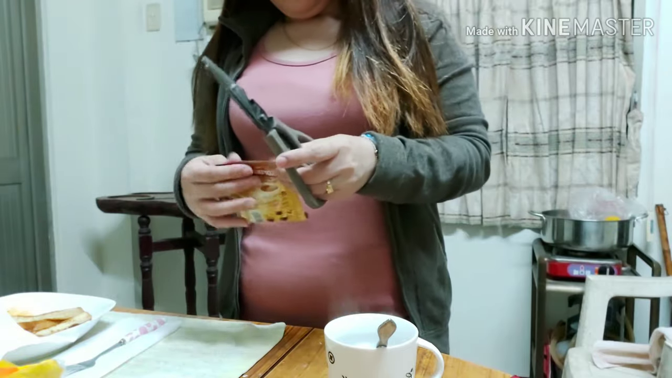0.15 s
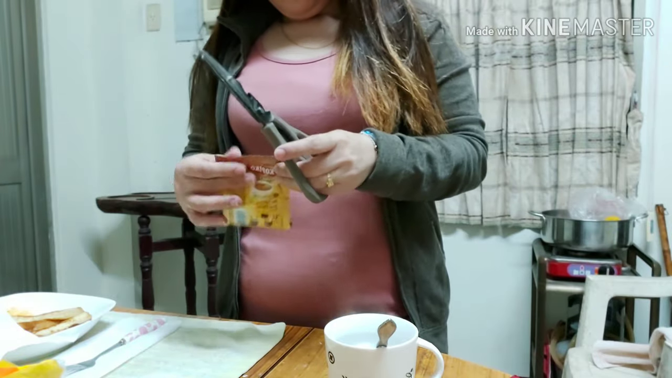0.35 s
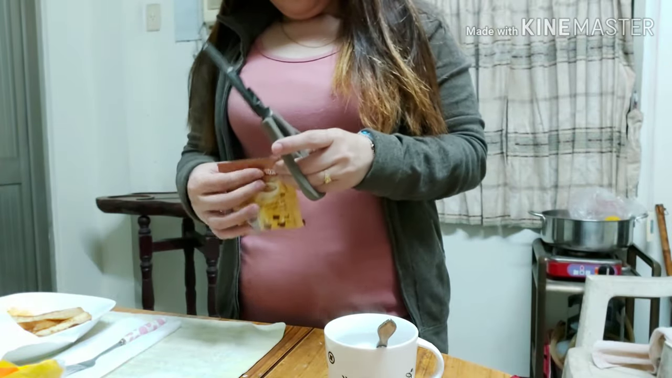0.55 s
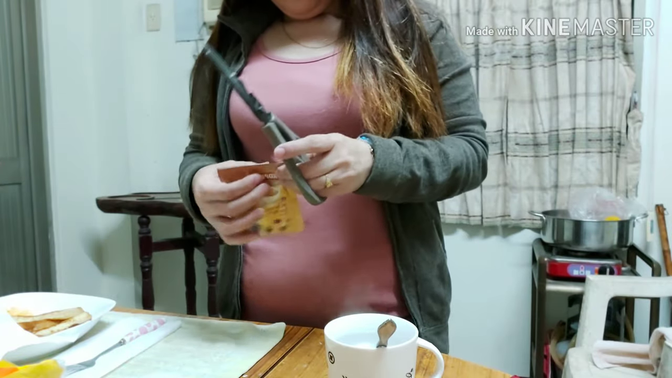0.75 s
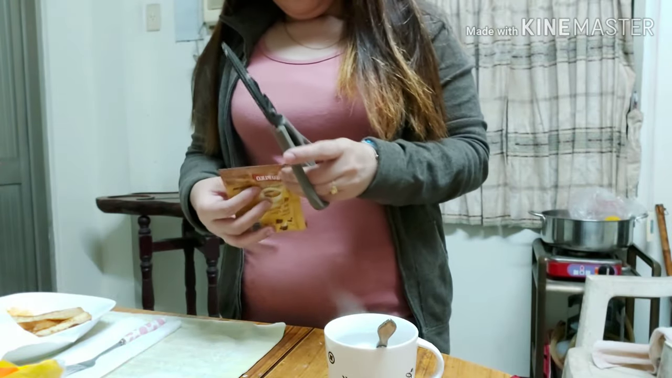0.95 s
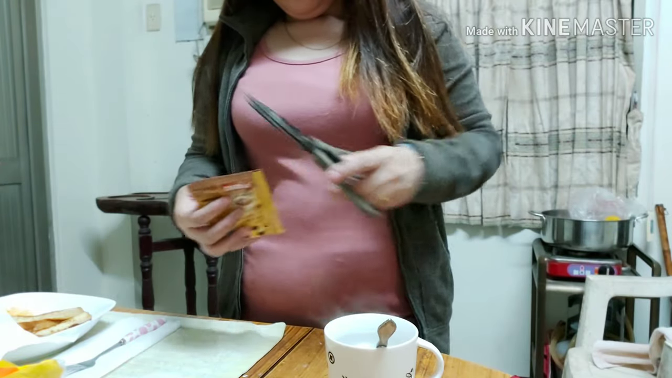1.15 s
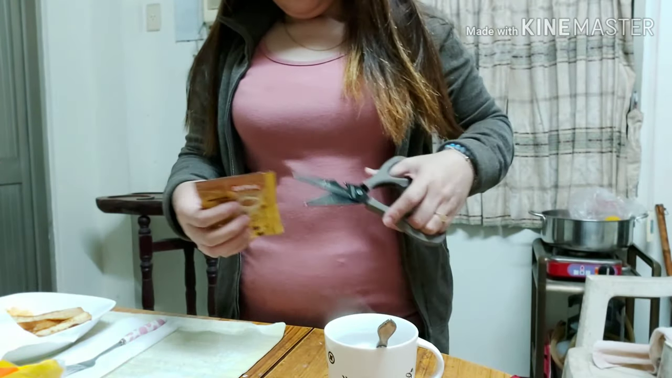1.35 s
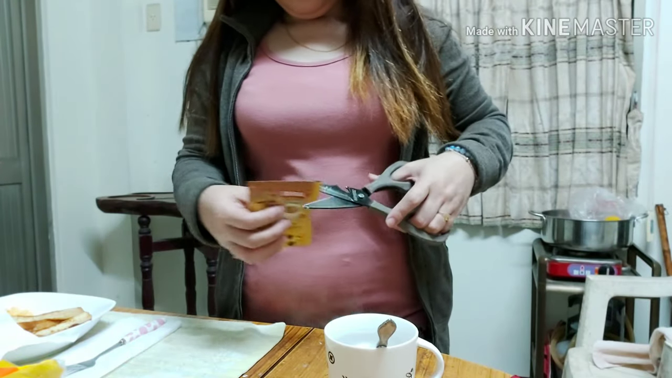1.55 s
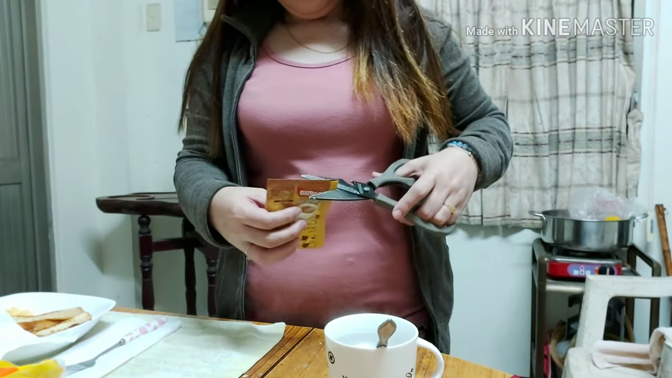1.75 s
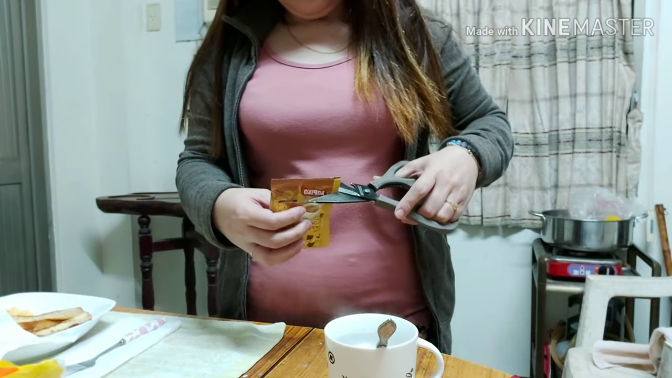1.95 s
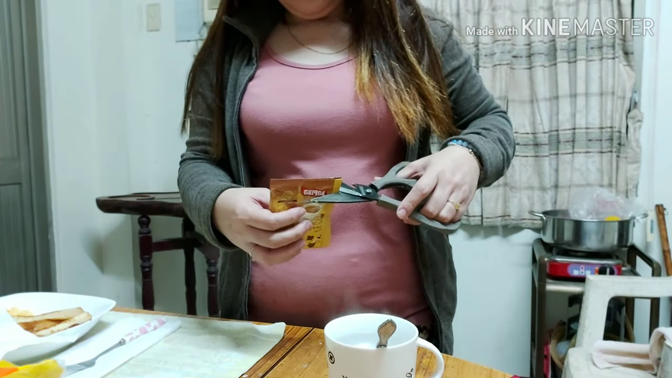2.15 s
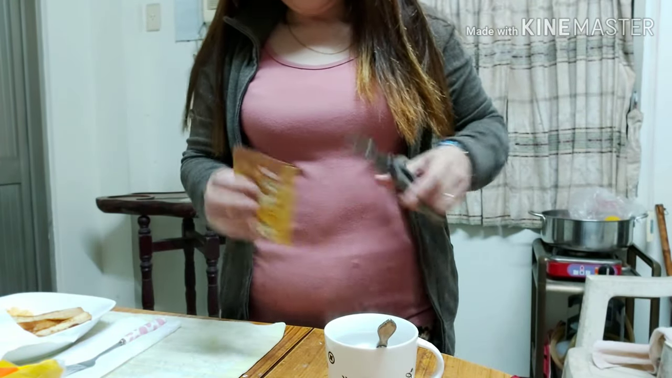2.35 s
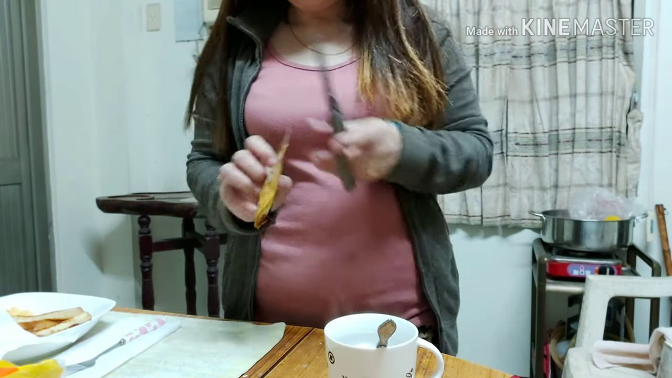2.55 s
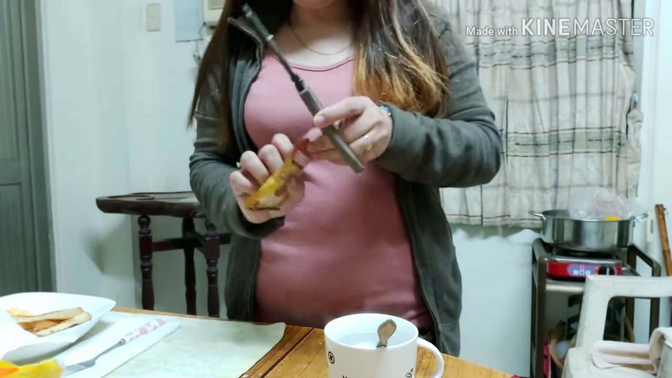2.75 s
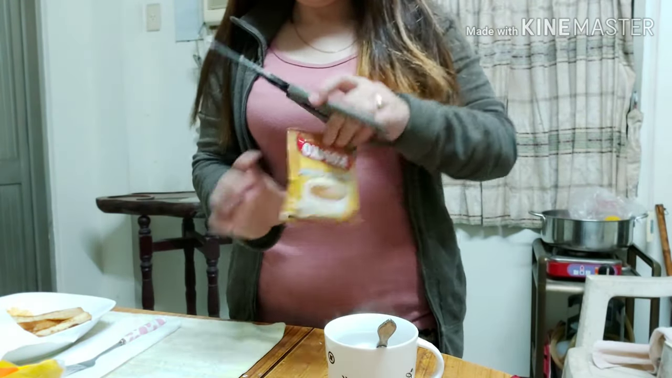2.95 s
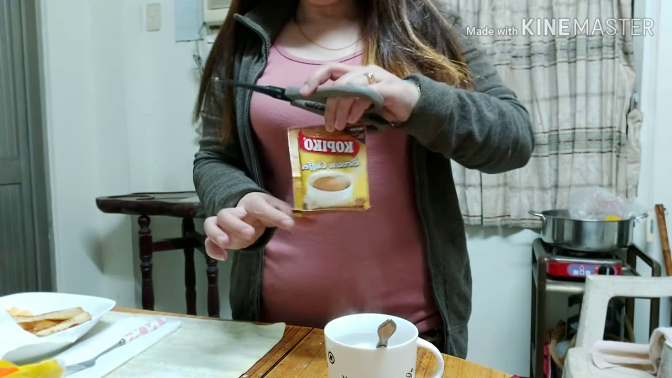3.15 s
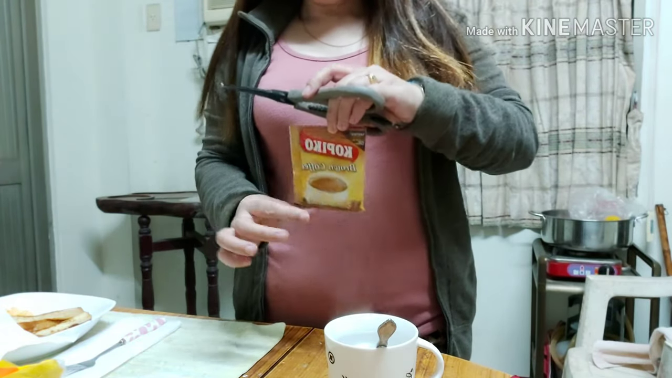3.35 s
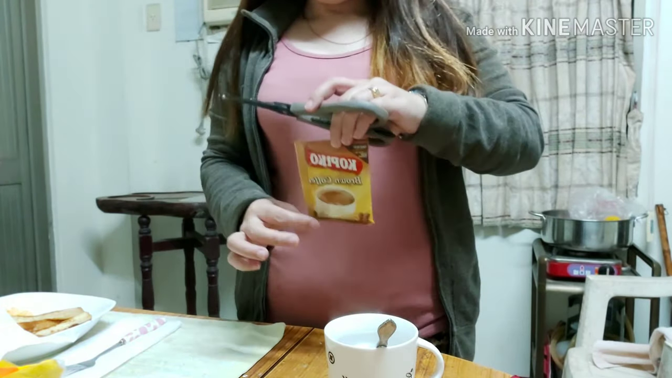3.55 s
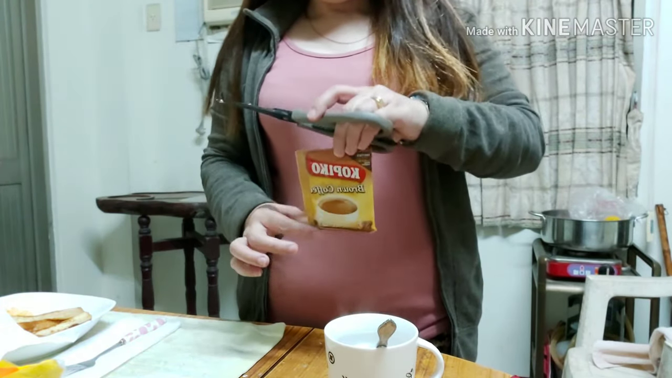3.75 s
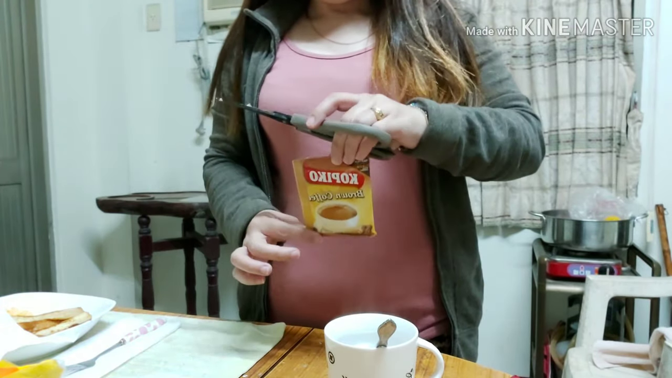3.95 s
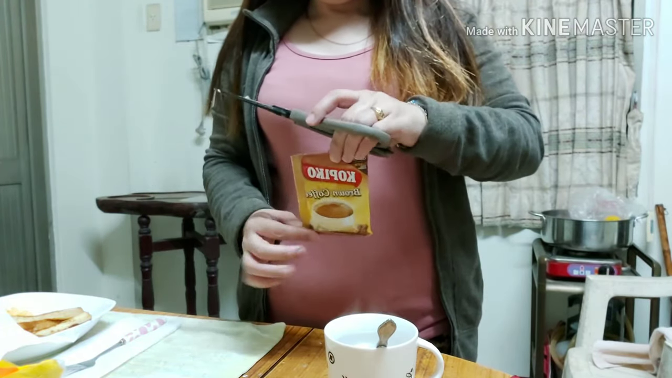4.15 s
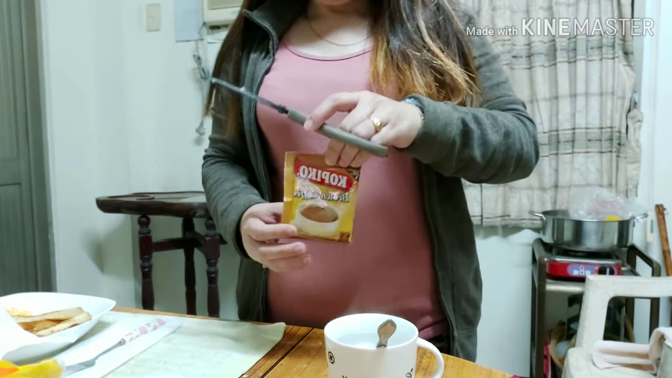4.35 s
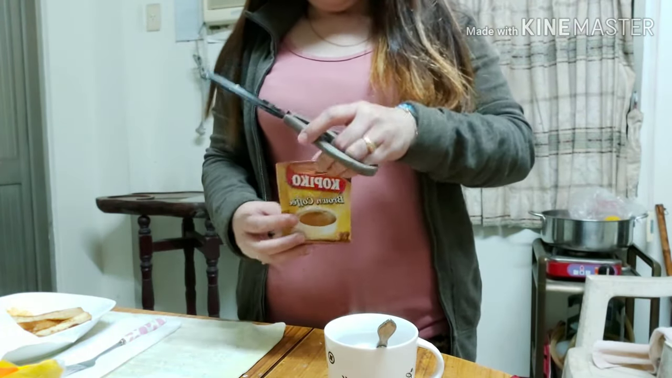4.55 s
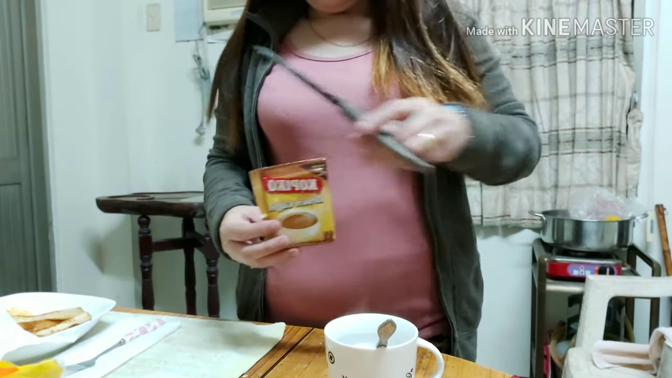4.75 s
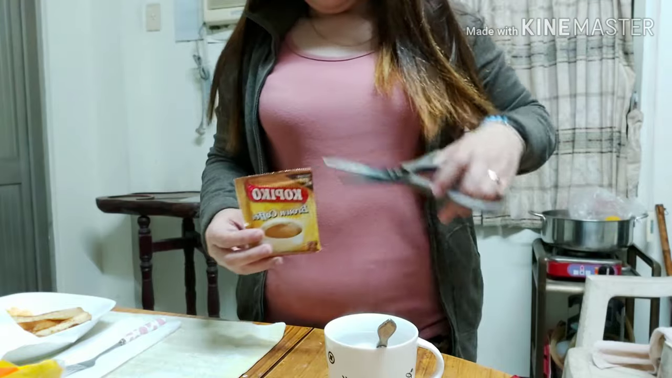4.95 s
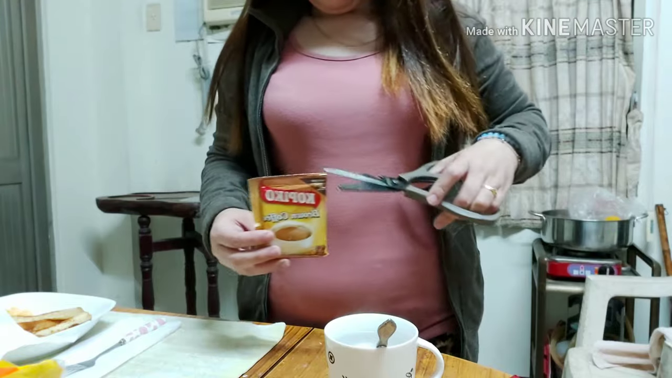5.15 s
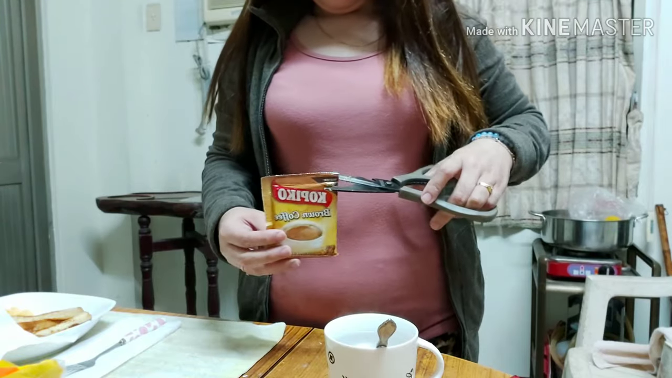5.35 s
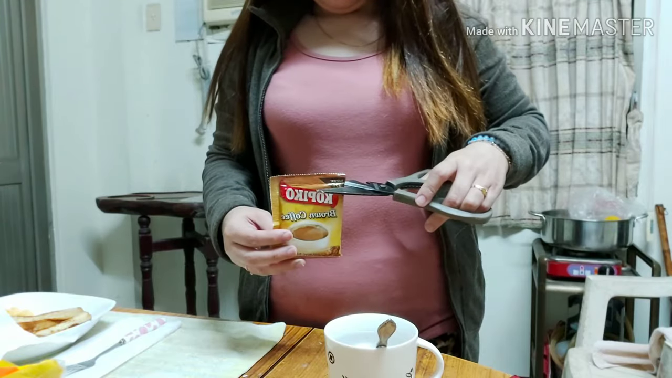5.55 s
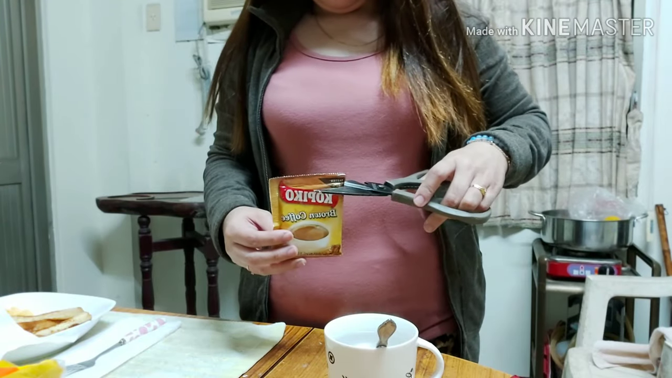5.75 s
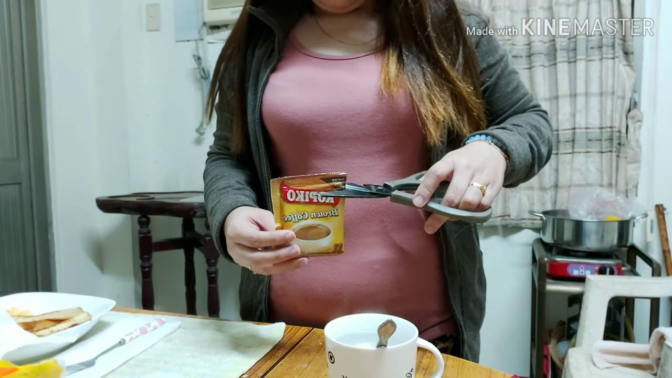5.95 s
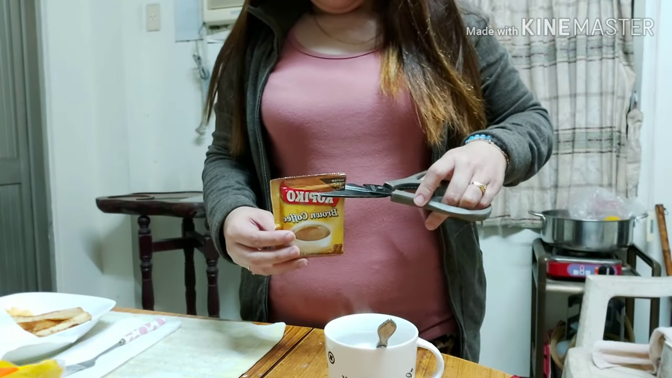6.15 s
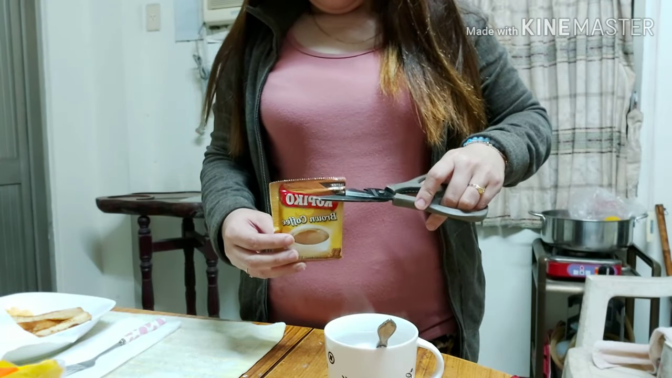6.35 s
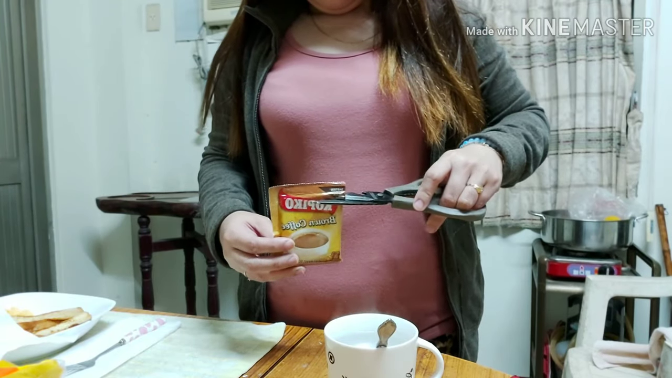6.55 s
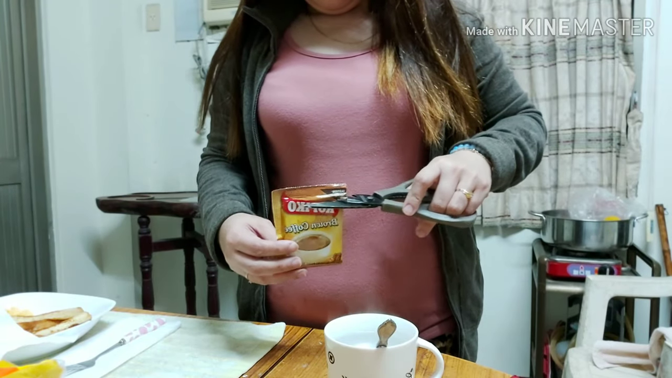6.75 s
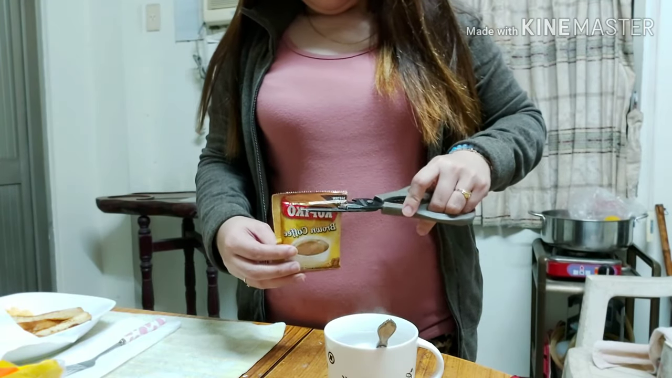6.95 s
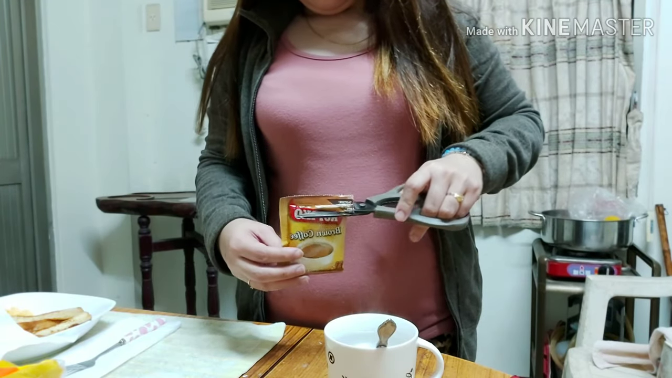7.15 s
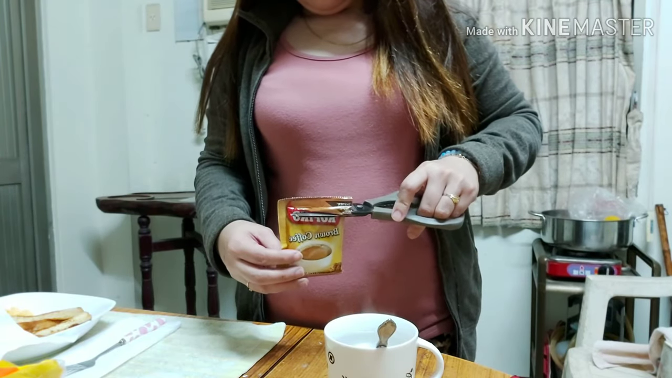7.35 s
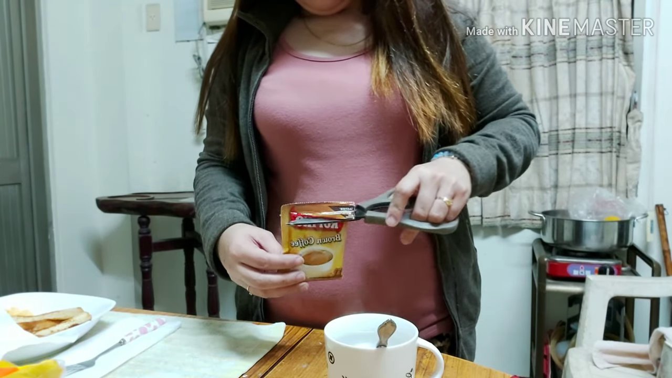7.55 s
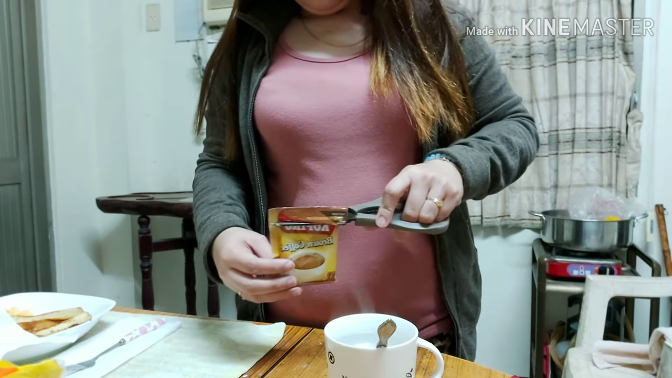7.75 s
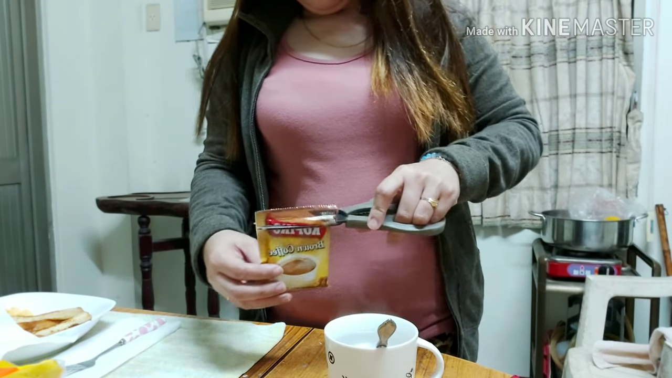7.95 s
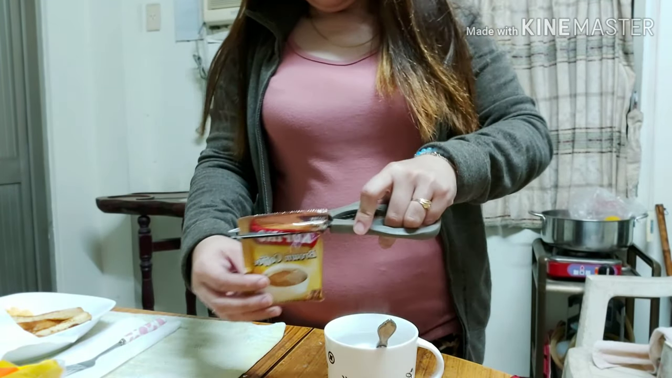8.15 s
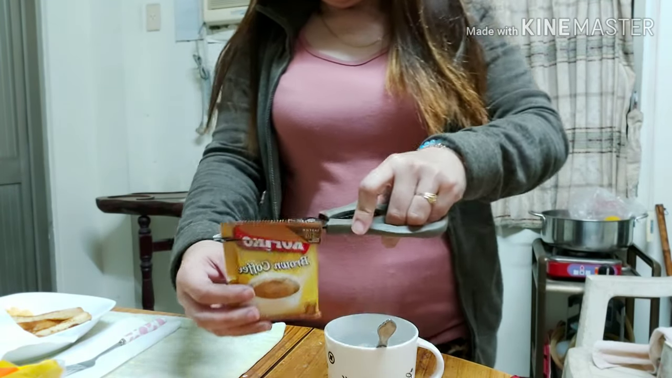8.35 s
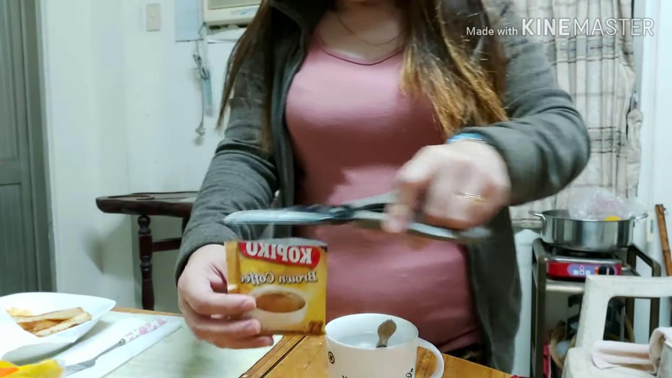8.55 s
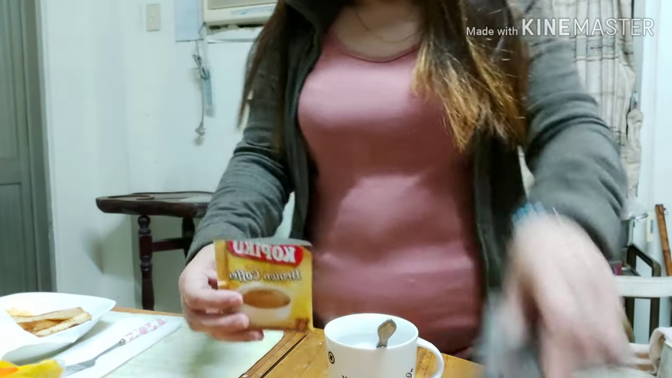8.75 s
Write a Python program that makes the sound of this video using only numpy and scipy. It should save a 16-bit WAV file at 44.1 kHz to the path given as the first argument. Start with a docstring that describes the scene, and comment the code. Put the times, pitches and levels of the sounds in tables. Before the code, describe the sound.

A small foil sachet is handled close to a stereo microphone in a hard-walled kitchen with a short, lively reverb. From 0 to 1.3 s it crinkles busily: sharp millisecond snaps, strongest around 0.65 s and 1.1 s, over fine crackle and soft rubbing of fingers and powder. Then it is nearly still, with a small snap at 1.8 s. From 2.5 to 3.6 s a second dense burst follows, with dull low knocks near 2.9 s. Quiet again, apart from a brief crinkle at 4.3-4.7 s. From about 6.2 s to 8.7 s the scissors work through the foil: strong crisp snaps at 6.4 s, then spaced crunchy snips and crackles, a bright snap at 7.8 s and small final ticks. Throughout, low air noise and a quiet wavering appliance hum continue, with a faint hiss pulsing almost three times a second, clearest near 3.8 s.

```python
"""A foil sachet is shaken down, turned in the fingers and cut open with scissors in a hard-walled kitchen.
Creases snap as millisecond noise bursts over a fine crackle and the rub of fingers and powder, both
streams of tiny pops; dull knocks are damped sines. Changing reflections answer all of these.
Behind, an appliance hums on drifting sines over steady air noise, and a faint noise hiss pulses
about three times a second."""
import sys
import numpy as np
from scipy import signal
from scipy.fft import rfft, irfft, next_fast_len
from scipy.io import wavfile
from scipy.ndimage import uniform_filter1d

SR = 44100
rng = np.random.default_rng(int(sys.argv[2]) if len(sys.argv) > 2 else 0)


def wrap_up_sound(samples):
    """Save the sound to the file named by the first command line argument, as 16-bit audio."""
    columns = np.atleast_2d(samples).T
    # keep every value between -1 and 1, then stretch to whole-number steps
    tamed = np.clip(columns, -1, 1)
    steps = np.round(tamed * 32767).astype(np.int16)
    wavfile.write(sys.argv[1], SR, steps)


N = 387373


def gain_of(db):
    """Decibels to gain."""
    return 10 ** (np.asarray(db) / 20)


def evened(x):
    """Scales to rms 1."""
    return x / np.sqrt(np.mean(x ** 2) + 1e-20)


def read(points, hz):
    """Joins (Hz, value) points by lines on a log-frequency axis."""
    point_hz, value = np.transpose(points)
    return np.interp(np.log(hz + 1), np.log(point_hz), value)


def bins(size):
    """Frequencies of a real spectrum, in Hz."""
    return np.fft.rfftfreq(size, 1 / SR)


def coloured(x, points):
    """Filters by a (Hz, dB) spectrum and scales to rms 1."""
    length = x.shape[-1]
    size = next_fast_len(length)
    spectrum = rfft(x, size) * gain_of(read(points, bins(size)))
    return evened(irfft(spectrum, size)[..., :length])


def add(mix, start_s, sound):
    """Adds a stereo sound at start_s, cut at the end of the mix."""
    part = mix[:, max(round(start_s * SR), 0):][:, :sound.shape[1]]
    part += sound[:, :part.shape[1]]


# likeness of diffuse sound at the two microphones: freq_hz, likeness_0_to_1
DIFFUSE_LIKENESS = [(60, 0.62), (150, 0.82), (300, 0.79), (600, 0.5), (1100, 0), (2000, 0.02)]


def diffuse(pair):
    """Two unrelated signals become one diffuse field: long waves reach both microphones alike."""
    size = next_fast_len(pair.shape[1])
    a, b = rfft(pair, size)
    same = read(DIFFUSE_LIKENESS, bins(size))
    right = same * a + np.sqrt(1 - same ** 2) * b
    return irfft(np.array([a, right]), size)[:, :pair.shape[1]]


def from_hands(pair, same=0.43, lead_samples=4, side_db=0.55):
    """Direct sound of the hands: partly alike in both channels, earlier and louder on the left."""
    a, b = diffuse(pair)
    right = np.roll(same * a + np.sqrt(1 - same ** 2) * b, lead_samples)
    return np.array([a * gain_of(side_db), right / gain_of(side_db)])


# air noise spectrum: freq_hz, density_db_per_hz
AIR_SPECTRUM = [(20, -29), (42, -8), (100, -3), (170, -0.5), (300, 1.5), (420, -9), (600, -18.5),
                (1200, -19.5), (2500, -25.5), (6000, -30), (15000, -37)]
# hum partials: pitch_hz, rms_db
HUM_PARTIALS = [(102, -74.5), (175.3, -68.5), (293.5, -74.5)]


def room_tone(air_db=-66, drift_hz=1.705, swell_db=2.4, knots_per_s=10):
    """Steady low air noise plus an appliance hum whose partials wander in pitch and level."""
    air = gain_of(air_db) * coloured(diffuse(rng.standard_normal((2, N))), AIR_SPECTRUM)
    t_s = np.arange(N) / SR
    knots_s = np.arange(0, N / SR + 1, 1 / knots_per_s)
    hum = np.zeros(N)
    for pitch_hz, rms_db in HUM_PARTIALS:
        drift, swell = (np.interp(t_s, knots_s, row) for row in rng.standard_normal((2, len(knots_s))))
        turns = np.cumsum(pitch_hz + drift_hz * drift) / SR
        hum += gain_of(rms_db) * evened(gain_of(swell_db * swell) * np.sin(2 * np.pi * turns))
    return air + hum


# hiss spectrum: freq_hz, density_db_per_hz
HISS_SPECTRUM = [(500, -15), (1150, -1.5), (1450, -13.5), (2150, 2), (2700, -12.5), (3350, -11.5),
                 (3850, 3.5), (4700, -7.5), (6300, 2.5), (9000, -9.5), (9800, -6), (10600, -12.5),
                 (12800, -5), (15500, -19)]
# hiss level at the end of each attack: time_s, level_db
HISS_LEVELS = [(2.3, -62.5), (3.8, -54.5), (4.9, -65), (5.6, -60)]
HISS_FIRST_S, HISS_PERIOD_S = 0.096, 0.3622
HISS_ATTACK_S, HISS_HOLD_S = 0.047, 0.22
# the sag acts from the end of the attack, the extra release from HISS_HOLD_S
HISS_SAG_DB_PER_S, HISS_EXTRA_RELEASE_DB_PER_S = 22.5, 96


def pulsing_hiss():
    """Faint diffuse noise that swells, sags and dies away in a steady cycle."""
    t_s = np.arange(N) / SR
    age_s = (t_s - HISS_FIRST_S) % HISS_PERIOD_S
    sag_db = HISS_SAG_DB_PER_S * (age_s - HISS_ATTACK_S)
    release_db = HISS_EXTRA_RELEASE_DB_PER_S * np.maximum(age_s - HISS_HOLD_S, 0)
    level_db = np.interp(t_s, *np.transpose(HISS_LEVELS)) - sag_db - release_db
    level = np.minimum(age_s / HISS_ATTACK_S, 1) * gain_of(level_db)
    return coloured(diffuse(rng.standard_normal((2, N))), HISS_SPECTRUM) * level


# squeezes and slides of the fingers: peak_s, length_s, rubbing_db, crackling_db
FINGER_STROKES = [(0.005, 0.11, -60, -58.5), (0.132, .24, -64.5, -55), (0.267, 0.13, -50.5, -46.5),
                  (0.334, 0.22, -53, -48), (0.486, .15, -51, -47), (0.642, 0.13, -47.5, -49.5),
                  (0.694, 0.26, -51, -46), (0.81, 0.3, -54, -49.5), (0.923, 0.27, -56, -51.5),
                  (1.033, 0.17, -53.5, -49.5), (1.114, 0.19, -55, -55), (1.309, 0.15, -68, -53.5),
                  (2.523, 0.17, -67, -52.5), (2.635, 0.25, -57.5, -50.5), (2.792, 0.27, -63, -46),
                  (2.898, 0.19, -51.5, -45), (2.977, 0.25, -55, -50), (3.364, 0.22, -55, -56),
                  (3.472, 0.21, -56.5, -75), (4.46, 0.22, -69, -61.5), (4.52, .14, -63.5, -63),
                  (4.677, 0.12, -56.5, -55), (6.376, 0.29, -59, -53.5), (6.478, 0.56, -60.5, -60.5),
                  (6.714, .17, -54.5, -45.5), (6.956, 0.24, -53, -48.5), (7.186, 0.16, -51.5, -48),
                  (7.417, 0.17, -54.5, -49.5), (7.6, 0.26, -60.5, -53), (7.744, 0.22, -59.5, -48),
                  (7.807, 0.22, -52.5, -47.5), (8.057, 0.27, -64, -55.5), (8.144, 0.18, -62, -55),
                  (8.267, 0.23, -59, -52), (8.474, 0.071, -50.5, -48), (8.698, 0.16, -62.5, -60)]
RISE_SHARE = 0.49  # part of a stroke in which the fingers press harder; they ease off in the rest
STROKE_DROP_DB = 20  # drop from the peak to either end of length_s
STROKE_ROUNDNESS = 1.24  # 1 = pointed, 2 = rounded


def pressure():
    """Every stroke swells and eases off in the same way; returns the gains of rubbing and crackling."""
    t_s = np.arange(N) / SR
    power = np.zeros((2, N))
    for peak_s, length_s, rubbing_db, crackling_db in FINGER_STROKES:
        near = abs(t_s - peak_s) < 2 * length_s
        offset_s = t_s[near] - peak_s
        away = np.maximum(-offset_s / RISE_SHARE, offset_s / (1 - RISE_SHARE)) / length_s
        level_db = np.array([[rubbing_db], [crackling_db]]) - STROKE_DROP_DB * away ** STROKE_ROUNDNESS
        power[:, near] += gain_of(level_db) ** 2
    return np.sqrt(power)


def grains(per_s, spread_db, decay_ms, low_hz, high_hz, noisy, size=400):
    """Tiny pops of uneven size at random times: decaying noise plus a sine of the pop's own pitch."""
    count = round(per_s * N / SR)
    place, strength, pitch, left, right = rng.random((count, 5)).T[..., None]
    t_s = np.arange(size) / SR
    size_db = spread_db * -np.log(np.maximum(strength, 1 / 20))  # few large, many small
    shape = gain_of(size_db) * np.exp(-t_s * 1000 / decay_ms)
    turns = low_hz * (high_hz / low_hz) ** pitch * t_s
    at = ((place * N).astype(int) + np.arange(size)).ravel()
    channels = []
    for phase in (left, right):
        tone = np.sin(2 * np.pi * (turns + phase))
        pops = shape * (tone + noisy * rng.standard_normal(shape.shape))
        channels.append(np.bincount(at, pops.ravel(), N)[:N])
    return from_hands(np.array(channels))


# rub of fingers and powder: freq_hz, density_db_per_hz
RUB_SPECTRUM = [(30, -23), (170, 0.5), (350, 2), (600, 0.5), (800, 2.5), (1150, -5.5), (1700, -5),
                (4000, -28)]
# crackle of small wrinkles: freq_hz, density_db_per_hz
CRACKLE_SPECTRUM = [(500, -9), (1200, 1), (1600, -3), (2700, 3), (4000, 0.5), (5300, -1.5), (7000, 2.5),
                    (15500, -10.5)]


def handling():
    """Fingers and powder rub the pouch; small wrinkles crackle as it bends."""
    rubbing, crackling = pressure()
    rub = grains(per_s=260, spread_db=5.5, decay_ms=3.3, low_hz=280, high_hz=1080, noisy=4.15)
    crackle = grains(per_s=380, spread_db=4.5, decay_ms=1.9, low_hz=1380, high_hz=12100, noisy=0.8)
    return coloured(rub, RUB_SPECTRUM) * rubbing + coloured(crackle, CRACKLE_SPECTRUM) * crackling


# reverberation time: freq_hz, t60_s
REVERB_T60 = [(150, 0.66), (700, 0.37), (2000, 0.54), (5000, 0.51), (9000, 0.39), (15000, 0.61)]


def room_response(tail_db=-2.0, gap_s=0.0063, near_db=-5, build_s=0.028, early_db=-18, size=24000):
    """Body and table scatter first, two walls answer; the tail holds to build_s, then dies band by band."""
    hz, t_s, z = signal.stft(diffuse(rng.standard_normal((2, size))), SR, nperseg=256)
    z *= gain_of(-60 * np.maximum(t_s - build_s, 0) / read(REVERB_T60, hz)[:, None])
    tail = signal.istft(z, SR, nperseg=256)[1]
    tail[:, :round(gap_s * SR)] *= gain_of(near_db)
    tail *= gain_of(tail_db) / np.linalg.norm(tail[0])
    for channel, echoes_s in enumerate([(0.0077, 0.0116), (0.0079, 0.0113)]):
        for echo_s in echoes_s:
            tail[channel, round(echo_s * SR)] += gain_of(early_db)
    return tail


def kitchen(x, turns_per_s=2.3, count=4):
    """The hands keep moving, so sound crossfades around several patterns of reflections."""
    turns = turns_per_s * np.arange(N) / SR
    reflected = np.zeros((2, N))
    for k in range(count):
        share = np.maximum(np.cos(2 * np.pi * (turns + k / count)), 0)
        reflected += signal.oaconvolve(x * share, room_response(), axes=1)[:, :N]
    return reflected


# snaps of the foil or the blades: start_s, level_db, brightness_db_per_octave, sheen_db
FOIL_SNAPS = [(0.064, -18.5, -9.5, 12), (0.126, -14.5, -7, 4), (0.272, -12.5, -0.5, -5),
              (0.3742, -7, -4.5, -2.5), (0.4505, -10.5, -11, 3), (0.517, -10.5, -0.5, 2),
              (0.5206, -4, -5, -5), (0.622, -5.5, 0, -3.5), (0.6502, 4.5, 0, -9.5), (0.657, 0, -3, 1.5),
              (0.7913, -4.5, -2, 0), (0.8151, -6, -1, -9), (0.8971, -11, -2.5, 8), (1.0101, -9.5, -10, 1),
              (1.027, -14, -9, 2), (1.0592, -5, -4, 1), (1.0875, -8, -14, 9), (1.1054, 0, -3, 1),
              (1.2515, -18.5, 2.5, 2.5), (1.499, -25.5, -3, 8.5), (1.5195, -22, -1.5, 3.5),
              (1.8386, -11.5, -1.5, 12.5), (2.488, -27, -3, 12), (2.6223, -7.5, 1.5, -4),
              (2.756, -5, -3, -0.5), (2.7789, -10, 0, 1.5), (2.8393, -7, -3.5, 1.5),
              (2.847, -5.5, 1.5, -10), (2.8823, -3, -1.5, 2.5), (2.9553, -1.5, -6, -6),
              (2.9799, -4.5, -7.5, -1), (3.002, -10, -5, 2), (3.0925, -11.5, -10, -7),
              (3.323, -13, -0.5, 8), (3.3292, -0.5, -7, 7), (3.355, -6, -1.5, -3), (3.363, -7, -5, 11),
              (3.443, -8, -3, 12.5), (3.4495, -3, -6.5, 1), (3.632, -10, -3, 4), (4.345, -21, -1.5, 16.5),
              (4.545, -11, -3, 2), (4.615, -6.5, -4.5, 2), (4.6238, -9.5, -3.5, 0.5),
              (6.197, -33.5, -4, 22), (6.3267, -26.5, 4.5, 9.5), (6.3976, -1, -3, -2), (6.4425, 1.5, -4, 2),
              (6.4775, -15, -2.5, 4), (6.5024, -2, -1.5, 5.5), (6.514, -10.5, -8, 9), (6.6711, -4, -6, 1.5),
              (6.7099, -2.5, -0.5, -3.5), (6.7947, -17, -1, 7), (6.8595, -18, -1, 14.5),
              (6.923, -16.5, 0, 7.5), (6.9853, -12, -3, 5), (7.0428, -11, 2, 3.5), (7.0875, -13.5, 1.5, 6),
              (7.1448, -10.5, 1, -1.5), (7.1515, -4.5, -5, 2), (7.3634, -11, -0.5, 2),
              (7.5693, -21, 3, -1.5), (7.783, 1.5, -3.5, 3), (8.0004, -14.5, 2.5, -2.5),
              (8.247, -17, -1, -1), (8.4572, -14.5, -2, 6), (8.671, -16, 5, 3.5), (8.6857, -4.5, 0.5, -6.5)]
# colour common to all snaps: freq_hz, gain_db
FOIL_COLOUR = [(60, -30), (170, -20), (330, -8.5), (750, -5.5), (1100, -13), (1600, 1), (3000, 0),
               (4000, 1.5), (5300, -0.5), (7000, 3), (12000, 1), (15500, -7)]
BRIGHT_FROM_HZ, BRIGHT_TO_HZ = 1950, 10500  # the smaller the facet, the more the treble rises here
SHEEN_HZ, SHEEN_OCTAVES = 4590, 1.115  # metallic sheen: centre, distance to 1/e of its dB


def snaps(smooth_bins, rise_ms=0.27, decay_ms=1.31, dull_ring=0.84, lead_in_db=-21, lead_in_ms=2.0,
          size=1024, lead_size=256):
    """A short noise burst with a faint lead-in, coloured by the facet that flips."""
    out, hz = np.zeros((2, N)), bins(size)
    ms = (np.arange(size) - lead_size) * 1000 / SR
    after_ms = np.maximum(ms, 0)
    lead_in = gain_of(lead_in_db) * np.exp(-abs(ms) / lead_in_ms)
    fade_in = np.exp(np.minimum(ms, 0) / lead_in_ms)
    octaves = np.log2(np.clip(hz, BRIGHT_FROM_HZ, BRIGHT_TO_HZ) / BRIGHT_FROM_HZ)
    sheen = np.exp(-(np.log2((hz + 1) / SHEEN_HZ) / SHEEN_OCTAVES) ** 2)
    for start_s, level_db, brightness, sheen_db in FOIL_SNAPS:
        ring_ms = decay_ms * gain_of(-dull_ring * brightness)  # big, dull facets ring longer
        shape = lead_in + (1 - np.exp(-after_ms / rise_ms)) * np.exp(-after_ms / ring_ms)
        burst = rfft(rng.standard_normal((2, size)) * shape)
        # flattened; resonances narrower than smooth_bins stay random
        burst /= np.sqrt(uniform_filter1d(abs(burst) ** 2, smooth_bins))
        colour_db = level_db + brightness * octaves + sheen_db * sheen + read(FOIL_COLOUR, hz)
        add(out, start_s - lead_size / SR, irfft(burst * gain_of(colour_db)) * fade_in)
    return out


# dull knocks of fingers and scissor handles on the sachet:
# start_s, level_db (before the envelope), pitch_hz, decay_ms
HAND_KNOCKS = [(0.268, -43.5, 418, 5.8), (1.028, -48, 520, 2.8), (2.882, -38, 350, 5.9),
               (2.978, -34, 448, 5.3), (4.714, -49, 493, 14.5), (6.709, -42.5, 450, 8.6),
               (6.961, -45.5, 440, 6.9), (7.205, -41, 433, 7.1), (7.415, -42, 380, 4.7),
               (8.449, -36.5, 393, 6.4)]


def knocks(rise_ms=1.5, size=6000):
    """One low mode, quickly damped by the hand."""
    out, ms = np.zeros((2, N)), np.arange(size) * 1000 / SR
    for start_s, level_db, pitch_hz, decay_ms in HAND_KNOCKS:
        envelope = (1 - np.exp(-ms / rise_ms)) * np.exp(-ms / decay_ms)
        ring = np.sin(2 * np.pi * pitch_hz * ms / 1000) * envelope
        add(out, start_s, gain_of(level_db) * np.array([ring, ring]))
    return out


def scene():
    """The sachet in the room, over the background."""
    hands = handling() + knocks()
    direct = from_hands(snaps(smooth_bins=41))
    # the walls hear every side of the foil, so its resonances partly average out
    all_round = snaps(smooth_bins=11)
    return direct + hands + kitchen(all_round + hands) + pulsing_hiss() + room_tone()


def record(dry, edge_hz=15700):
    """Limits the band with a linear-phase low-pass."""
    low_pass = signal.firwin(141, edge_hz, window=("kaiser", 9), fs=SR)
    return signal.oaconvolve(dry, low_pass[None], "same")


dry = scene()
out = record(dry)
wrap_up_sound(out)
```